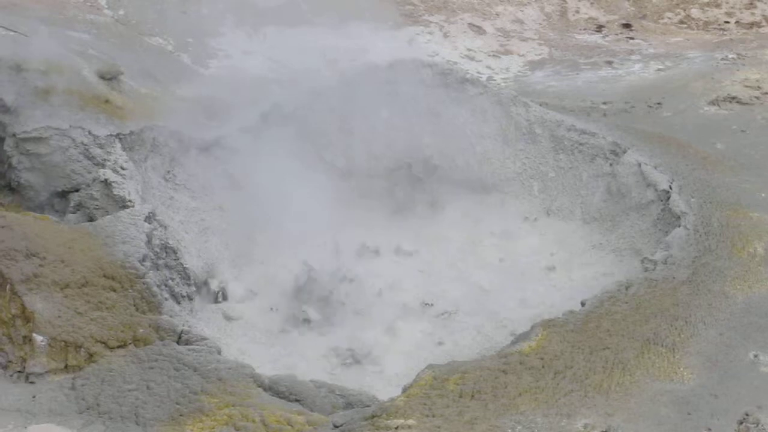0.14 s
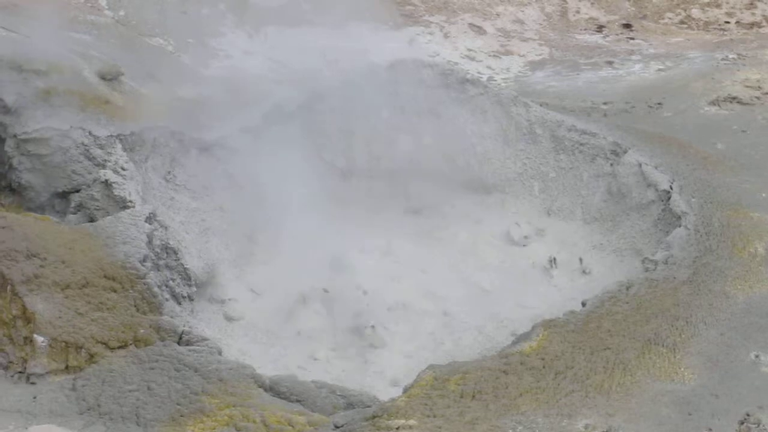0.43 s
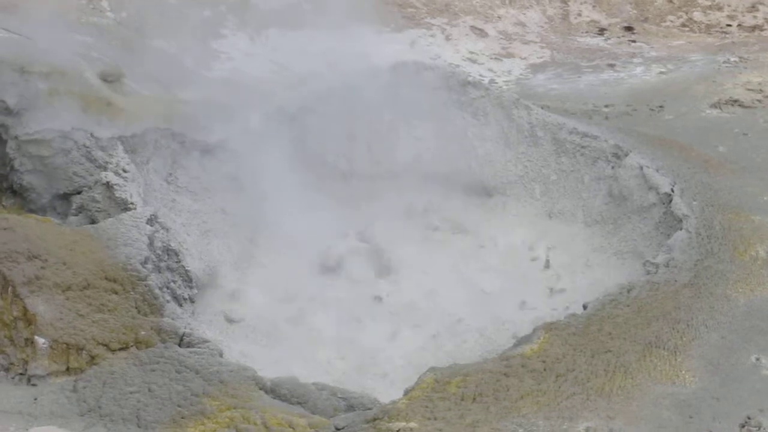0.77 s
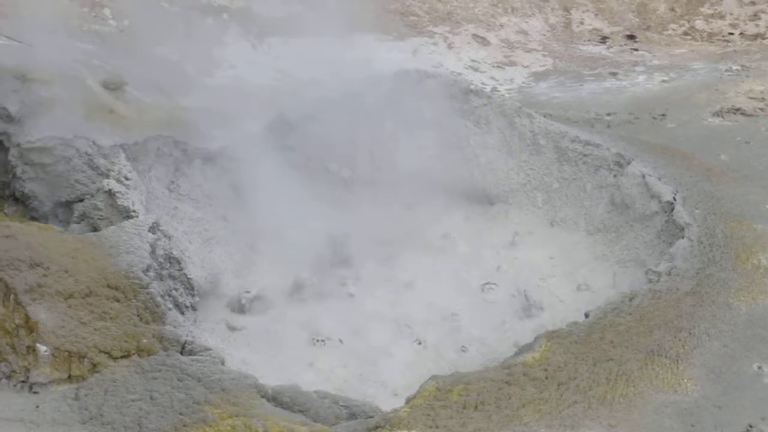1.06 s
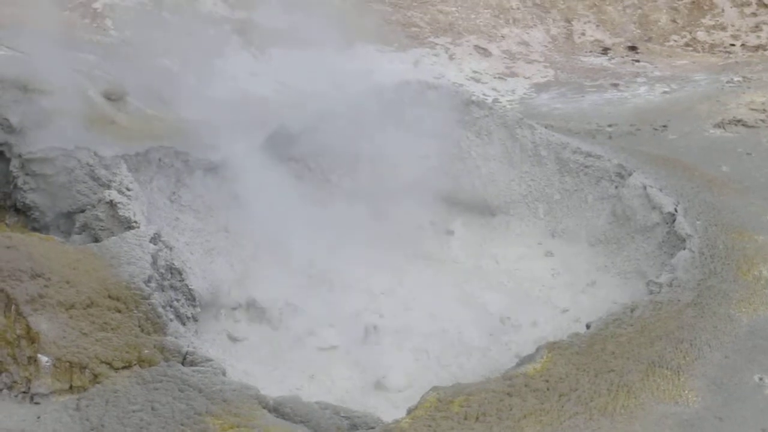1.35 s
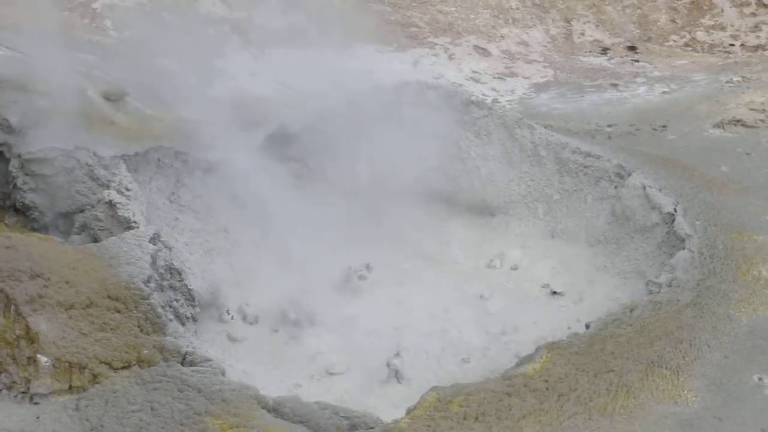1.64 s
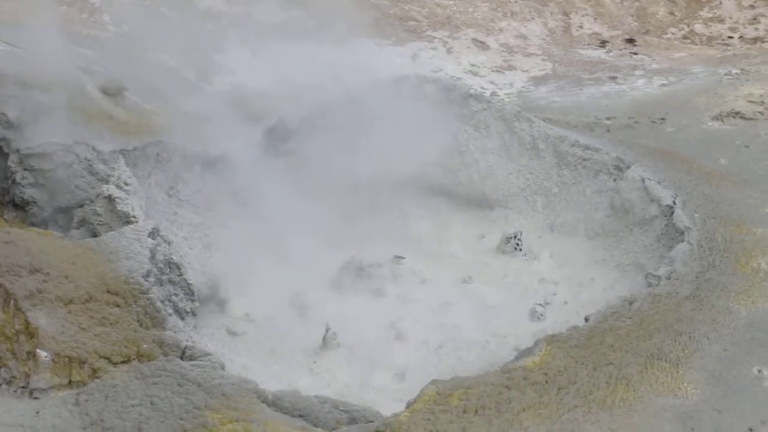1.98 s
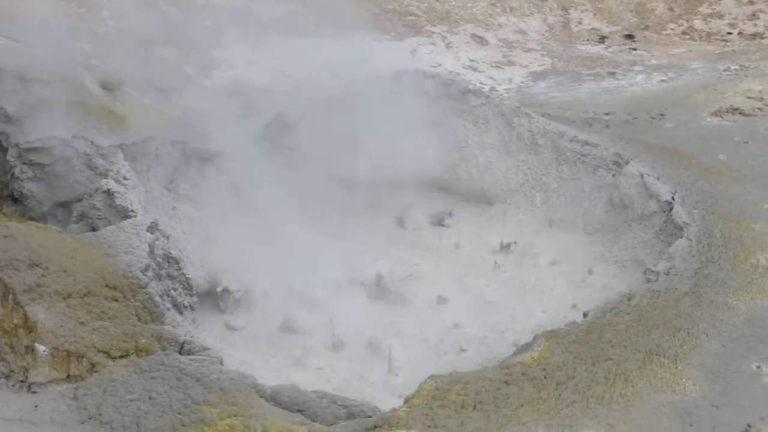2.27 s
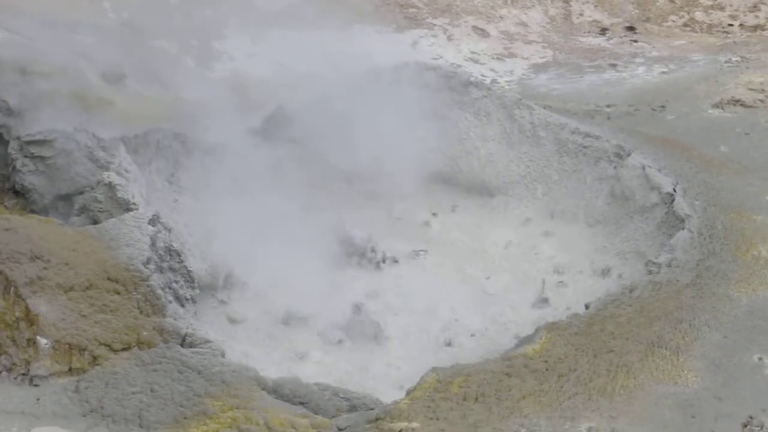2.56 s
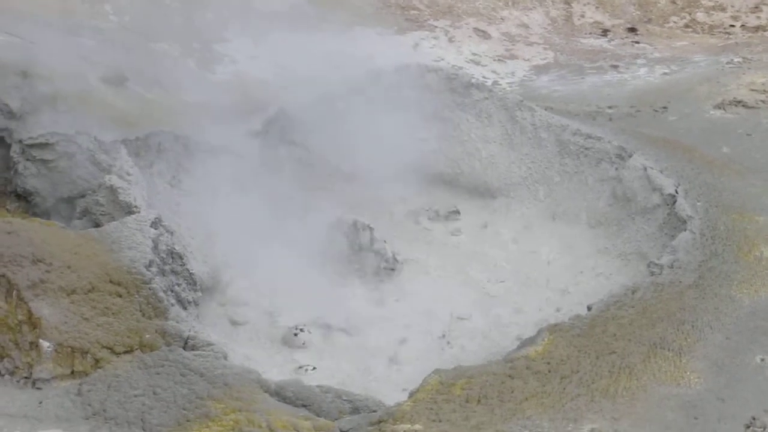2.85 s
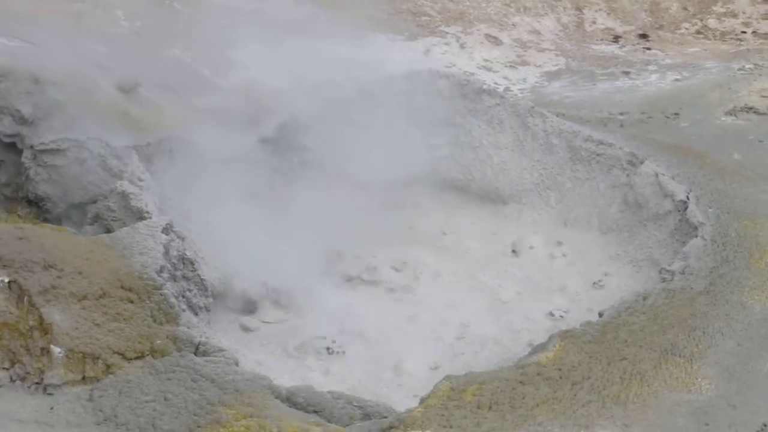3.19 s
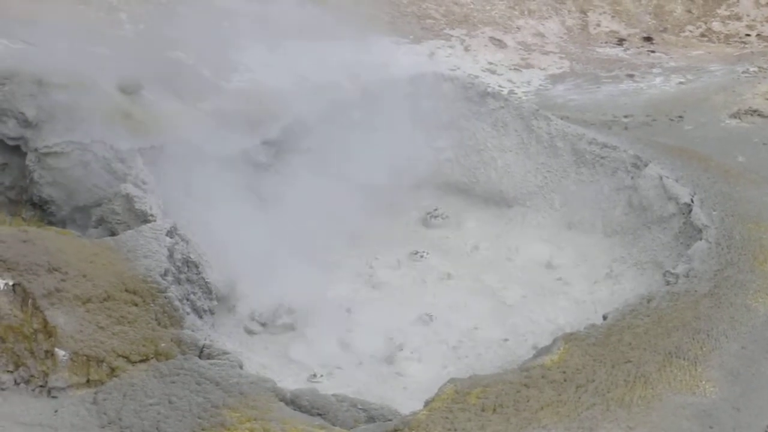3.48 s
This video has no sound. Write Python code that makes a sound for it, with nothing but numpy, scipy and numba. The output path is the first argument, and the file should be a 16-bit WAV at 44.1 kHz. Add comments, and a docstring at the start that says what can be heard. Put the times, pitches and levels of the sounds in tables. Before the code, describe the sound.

Thick mud boils and gurgles, popping and splashing over a steady hiss of steam.

```python
"""A thick gurgle and a hiss of steam: a mud pool boils a few metres below, and light wind rumbles at the mic.
Steam bubbles of all sizes burst in the mud, each a short tone that climbs in pitch as it opens.
Out of that bed, small ones pop and tick and big ones gulp. Thrown mud slaps and splashes back
as bursts of gritty noise. Two microphone ports hear nearly the same lows and less alike highs."""
import sys
import numpy as np
from scipy import signal
from scipy.fft import rfft, irfft
from scipy.io import wavfile
from scipy.ndimage import uniform_filter1d
from numba import njit

SR = 44100
rng = np.random.default_rng(int(sys.argv[2]) if len(sys.argv) > 2 else 0)


def materialize(psi):
    """Save the field psi as 16-bit PCM at rate SR to the path in sys.argv[1].

    A 1-D psi becomes a single channel; in a 2-D psi each row is a channel.
    """
    bounded = np.clip(np.atleast_2d(psi).T, -1, 1)
    quanta = np.round(bounded * 32767).astype(np.int16)
    wavfile.write(sys.argv[1], SR, quanta)


N = 159642
SPLIT_HZ = 600  # gurgle below, fizz and spray above


def undb(db):
    return 10 ** (np.asarray(db) / 20)


def unit_rms(x):
    return x / np.sqrt(np.mean(x ** 2))


def fader(table, column=1):
    """A dB column as a gain over time."""
    rows = np.array(table)
    return undb(np.interp(np.arange(N) / SR, rows[:, 0], rows[:, column]))


def octaves_above(hz, size=N):
    return np.log2((np.fft.rfftfreq(size, 1 / SR) + 1) / hz)


def over_hz(table, size=N, column=1):
    rows = np.array(table)
    return np.interp(octaves_above(1, size), np.log2(rows[:, 0]), rows[:, column])


def bell(hz, width_oct, size=N):
    return np.exp(-.5 * (octaves_above(hz, size) / width_oct) ** 2)


def eq(x, gain):
    return irfft(rfft(x) * gain, len(x))


def wander(rate_hz):
    """A smooth random drift of unit spread."""
    hold = int(SR / rate_hz)
    steps = np.repeat(rng.standard_normal(N // hold + 1), hold)
    drift = uniform_filter1d(uniform_filter1d(steps, hold), hold)[:N]
    return drift / drift.std()


@njit
def bubbles(start_s, pitch_hz, cycles, gain, rise):
    """Each bubble swells fast, rings for a few cycles and climbs in pitch as it opens."""
    out = np.zeros(N)
    for k in range(len(start_s)):
        span, phase, onset = cycles[k] * SR / pitch_hz[k], 0., int(start_s[k] * SR)
        for i in range(min(int(3 * span), N - onset)):
            age = 4 * i / span
            phase += 2 * np.pi * pitch_hz[k] * (1 + rise[k] * (i / span - .3)) / SR
            out[onset + i] += gain[k] * age * np.exp(1 - age) * np.sin(phase)
    return out


# The pool's dark tone colour: frequency_hz, gain_db
POOL_EQ = [(15, -25), (25, -11), (59, 2.5), (253, -1.5), (314, -3), (410, -11), (523, -10), (598, -13.5),
           (762, -11.5), (920, -16.5), (1050, -16), (1200, -21.5), (1530, -19), (1950, -21.5),
           (2700, -21.5), (3440, -24.5), (5010, -21.5), (6900, -24.5), (8300, -35), (10900, -50),
           (13600, -56), (15500, -81)]
# How hard it boils: time_s, gurgle_fader_db, fizz_and_steam_fader_db
BOIL_FADERS = [(0.0, -30.5, -39), (0.58, -33.5, -35), (1.08, -30.5, -39), (1.19, -36.5, -39),
               (1.39, -32.5, -37.5), (1.43, -32, -37), (2.08, -30.5, -40.5), (2.13, -26, -36.5),
               (2.19, -33, -39), (2.4, -28, -41), (2.57, -33, -39.5), (2.63, -30.5, -37.5),
               (2.87, -31, -39.5), (2.92, -34, -38.5), (2.96, -30.5, -40), (3.2, -29, -37.5),
               (3.61, -33, -34.5)]


def boil():
    """The bed: clumps of bubbles gurgle over churning mud and fizz under hissing steam."""
    count = int(2400 * N / SR)  # 2400 bubbles a second
    when, pitch, size, ring = rng.random((count, 4)).T
    pitch_hz = 50 * 200 ** pitch  # 50 Hz to 10 kHz
    size_db = 5 * np.minimum(-np.log(1 - size), 1)
    clump_db = 2.5 * wander(rate_hz=14)[(when * N).astype(int)]
    gain = pitch_hz * undb(size_db + clump_db)
    swarm = bubbles(when * N / SR, pitch_hz, 2.45 * (.5 + ring), gain, rise=np.full(count, .45))
    noise = rng.standard_normal(N)
    high_share = 1 / (1 + np.exp(-2 * octaves_above(SPLIT_HZ)))
    colour = undb(over_hz(POOL_EQ))
    lows, highs = colour * np.sqrt(1 - high_share), colour * np.sqrt(high_share)
    gurgle = undb(-10) * unit_rms(eq(swarm, lows))
    churn = undb(-3) * unit_rms(eq(noise, lows))
    fizz = undb(-3) * unit_rms(eq(swarm, highs))
    steam = undb(-1 + 1.28 * wander(rate_hz=9.19)) * unit_rms(eq(noise, highs))
    return (gurgle + churn) * fader(BOIL_FADERS) + (fizz + steam) * fader(BOIL_FADERS, column=2)


# Gusts at the microphone: time_s, fader_db
GUSTS = [(0.0, -51), (0.24, -34), (0.38, -63), (0.56, -30.5), (0.63, -66), (0.78, -38), (0.9, -49),
         (0.94, -36), (1.46, -43.5), (1.83, -33.5), (1.92, -57), (2.06, -36.5), (3.43, -34.5), (3.62, -51)]


def wind():
    """Wind on the microphone: a narrow sub-bass rumble that comes in gusts."""
    return fader(GUSTS) * unit_rms(eq(rng.standard_normal(N), bell(hz=40, width_oct=.22)))


def spray(size, centre_hz, width_oct):
    """Droplets of mud: a band of gritty noise in the pool's colour."""
    grit = np.repeat(undb(2 * rng.standard_normal(size // 32)), 32)
    tone = undb(over_hz(POOL_EQ, size)) * bell(centre_hz, width_oct, size)
    low_cut = octaves_above(SPLIT_HZ, size) > 0
    return unit_rms(eq(grit * rng.standard_normal(size), tone * low_cut))


# Sharp little slaps: start_s, peak_db, centre_hz, length_s
SPLATS = [(0.028, -28.5, 6690, 0.0045), (0.171, -26, 3070, .003), (.3944, -23, 3000, .003),
          (.5142, -19.5, 2980, .003), (0.519, -17.5, 6040, 0.0035), (0.54, -20.5, 6000, 0.0022),
          (.6515, -23, 5800, .002), (.672, -19, 5600, .002), (.679, -18.5, 6600, 0.0033),
          (0.708, -28, 3400, .002), (0.725, -22.5, 6500, 0.0041), (.8065, -31, 3000, 0.0064),
          (0.8393, -21, 3400, 0.0024), (0.887, -19, 3100, 0.0012), (0.984, -23.5, 6400, 0.0015),
          (1.007, -23, 7850, .002), (1.179, -27, 5750, .0025), (1.2576, -25, 6500, 0.0011),
          (1.2618, -27, 6000, .0015), (1.2786, -17.5, 6250, 0.0017), (1.3178, -25, 8000, 0.0013),
          (1.324, -30, 5000, .002), (1.3275, -27, 8500, .0015), (1.3278, -20, 2860, 0.0022),
          (1.3635, -23.5, 3020, 0.0023), (1.38, -23.5, 8000, .002), (1.519, -29, 7540, 0.0016),
          (1.609, -27.5, 7200, .002), (1.693, -21.5, 6140, 0.0023), (1.7855, -26, 6560, 0.0023),
          (1.8623, -21, 6950, 0.0033), (1.887, -24, 3100, 0.01), (2.0213, -19, 5170, .0025),
          (2.0423, -24, 3600, 0.0022), (2.0425, -24, 7200, 0.002), (2.117, -18, 4400, .0025),
          (2.396, -25, 5600, 0.0023), (2.425, -27, 6530, 0.0025), (2.5765, -26, 6550, .002),
          (2.6667, -22.5, 6600, 0.003), (2.722, -24, 5800, .002), (2.795, -33, 6400, 0.0018),
          (2.824, -25, 7270, 0.0035), (3.045, -22, 2880, .003), (3.049, -27.5, 6800, .0025),
          (3.273, -28, 2980, 0.0025), (3.453, -26, 5580, .002)]


def splats(size=8192):
    """Single blobs slap the surface: instant attack, quick decay."""
    out = np.zeros(N + size)
    for start_s, peak_db, centre_hz, length_s in SPLATS:
        onset, age = int(start_s * SR), 4 * np.arange(size) / SR / length_s
        slap = spray(size, centre_hz, width_oct=.59) * age * np.exp(1 - age)
        out[onset:onset + size] += slap / np.abs(slap).max() * undb(peak_db)
    return out[:N]


# Soft, wide splashes: start_s, length_s, level_db, centre_hz
SPLASHES = [(0.165, 0.033, -43, 2170), (0.181, 0.048, -34, 2690), (0.42, 0.047, -34, 3020),
            (0.458, 0.097, -33, 3200), (0.556, 0.093, -39, 2890), (0.635, 0.032, -32, 2610),
            (0.667, 0.027, -31, 4200), (0.704, 0.043, -31, 2300), (0.8, 0.029, -31, 3400),
            (0.907, 0.03, -35, 2670), (1.093, 0.04, -34.5, 2990), (1.239, 0.029, -36, 3140),
            (1.35, 0.034, -33, 2950), (1.573, 0.067, -35, 2520), (2.127, 0.029, -33, 2600),
            (2.199, 0.054, -34, 2000), (2.639, 0.07, -33, 3400), (3.03, 0.04, -36.5, 2500),
            (3.148, 0.03, -33.5, 2630), (3.247, 0.043, -32, 2290), (3.285, 0.043, -37, 2540),
            (3.32, 0.056, -32, 2620), (3.37, 0.019, -38, 2650), (3.549, 0.032, -36, 2570)]


def splashes(size=8192):
    """Thrown mud falls back in a spray that swells and fades."""
    out = np.zeros(N + size)
    for start_s, length_s, level_db, centre_hz in SPLASHES:
        onset = int(start_s * SR)
        swell = np.sin(np.pi * np.clip(np.arange(size) / SR / length_s, 0, 1)) ** 2
        out[onset:onset + size] += spray(size, centre_hz, width_oct=1.7) * swell * undb(level_db)
    return out[:N]


# Foreground pops: start_s, peak_db, pitch_hz, ring_cycles
POPS = [(0.1708, -24.5, 1730, 4.6), (0.435, -29, 3260, 4.4), (.4484, -22.5, 2970, 4),
        (0.5163, -13, 800, 0.75), (.6410, -9.5, 860, 2.3), (.6418, -22, 1580, 2.5),
        (.6450, -12.5, 850, 1.5), (.684, -30, 4560, 6.6), (.7065, -24, 1600, 3), (0.722, -22, 2680, 3.5),
        (0.7282, -19, 2600, 3.2), (.728, -25.5, 530, 5.3), (.884, -21, 700, 3), (.944, -23, 675, 3.3),
        (1.2501, -25.5, 2550, 12), (1.2682, -21, 3400, 2.8), (1.5894, -25.5, 1720, 3.7),
        (2.0209, -18.5, 1010, 3.3), (2.0206, -24, 2410, 4.4), (2.0324, -25, 4720, 3.6),
        (2.1174, -18.5, 3150, 7.4), (2.132, -19, 560, 0.9), (2.2214, -23, 1490, 3.5),
        (2.2258, -22, 1500, 2.3), (2.241, -24, 2880, 5.1), (2.671, -23, 641, 2), (2.729, -22, 2880, 2.7),
        (2.8205, -26, 3430, 6), (2.824, -24, 2500, 3.7), (2.8504, -22.5, 2720, 2.6),
        (2.9076, -20.5, 2200, 5), (3.0472, -19.5, 616, 1.4), (3.0395, -22, 1910, 2.8),
        (3.0457, -17, 2880, 2.3), (3.059, -24, 2500, 3), (3.337, -30, 695, 5.6), (3.3495, -26, 1620, 4)]


def pops():
    """Small bubbles burst, ringing for at least one cycle with a slight upward chirp."""
    start_s, peak_db, pitch_hz, cycles = np.array(POPS, float).T
    return bubbles(start_s, pitch_hz, np.maximum(cycles, 1), undb(peak_db), rise=np.full(len(POPS), .14))


# Deep gulps: start_s, length_s, peak_db, pitch_hz, rise_fraction
GULPS = [(0.46, 0.037, -23.5, 193, 0.25), (0.718, 0.046, -30.5, 285, 0.24),
         (0.957, 0.029, -19.5, 62.6, 0.27), (1.002, 0.039, -30, 267, 0.28), (1.045, 0.092, -26, 130, 0.15),
         (1.079, 0.034, -24.5, 243, 0.3), (1.306, 0.039, -22.5, 76, 0.23),
         (1.332, 0.082, -26.5, 109.5, 0.19), (1.375, 0.027, -22, 182, 0.25), (2.102, 0.039, -24, 60.7, .2),
         (2.113, 0.031, -20, 176, 0.039), (2.116, 0.034, -26.5, 124, .1), (2.126, 0.029, -24.5, 290, 0.16),
         (2.339, 0.019, -27.5, 234, 0.39), (2.605, 0.091, -26.5, 96, 0.16), (2.741, 0.029, -25.5, 238, 0.3),
         (2.909, 0.042, -24.5, 194, 0.074), (3.089, 0.022, -23, 103, 0.56), (3.14, 0.065, -30, 237, 0.18),
         (3.27, 0.028, -27.5, 191, 0.18)]


def gulps():
    """Big, slow bubbles open with a low note that bends upward."""
    start_s, length_s, peak_db, pitch_hz, rise = np.array(GULPS, float).T
    return bubbles(start_s, pitch_hz, length_s * pitch_hz, undb(peak_db), rise)


# The stereo image: frequency_hz, left_over_right_db, left_lead_rad, likeness (0 to 1)
MIC_PORTS = [(30, 5.3, 0, .9), (120, 4, 0, .99), (700, 3.4, 0, .995), (1400, 3.2, 0, .97),
             (2400, 3.4, 0, .93), (4400, 4.5, -.2, .82), (5200, 2.5, -1.1, .74), (6000, 0, -1.8, .62),
             (7000, -3.5, -1.3, .55), (8300, -5, -.5, .62), (10000, -3, -.1, .65), (13000, 0, 0, .6)]


def mic_ports(front, sides):
    """Two spectra to stereo: both ports share the front and take the sides in opposite polarity."""
    likeness = over_hz(MIC_PORTS, column=3)
    pan = undb(over_hz(MIC_PORTS) / 2) * np.exp(.5j * over_hz(MIC_PORTS, column=2))
    shared, apart = np.sqrt((1 + likeness) / 2) * front, np.sqrt((1 - likeness) / 2) * sides
    return np.array([irfft((shared + apart) * pan, N), irfft((shared - apart) / pan, N)])


def scene():
    """Most of the pool arrives from the front; the rest comes from other sides and off the rim."""
    high_cut = 1 / np.sqrt(1 + 2 ** (16 * octaves_above(hz=12200)))
    hits = eq(splats() + splashes() + pops() + gulps(), high_cut)
    t, scatter_s = np.arange(8192) / SR, .0033
    rim = rfft(rng.standard_normal(len(t)) * np.exp(-t / scatter_s), N)
    rim /= np.sqrt(np.mean(np.abs(rim) ** 2))
    front = rfft(boil() + hits + undb(.5) * wind())
    sides = rfft(boil() + undb(-1) * wind()) + rfft(hits) * rim
    return mic_ports(front, sides)


def record(dry):
    """Faint microphone hiss, then a steep high cut at 15.5 kHz."""
    hiss = undb(-67) * rng.standard_normal(dry.shape)
    return signal.sosfilt(signal.ellip(12, .2, 70, 15500, fs=SR, output="sos"), dry + hiss)


dry = scene()
out = record(dry)
materialize(out)
```